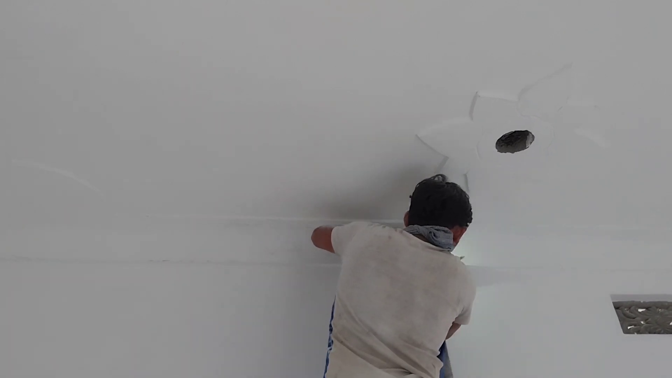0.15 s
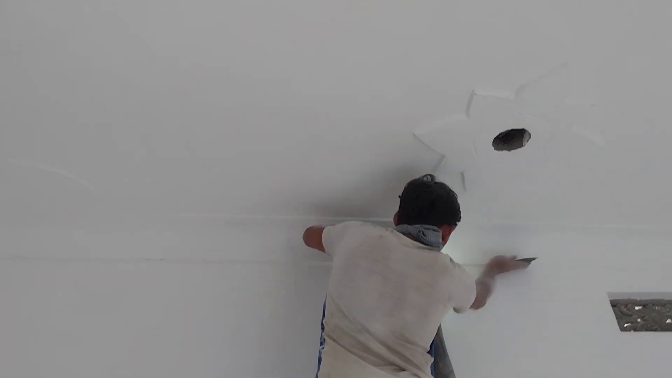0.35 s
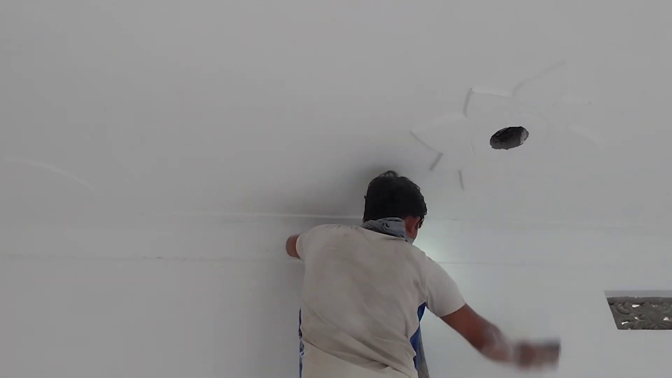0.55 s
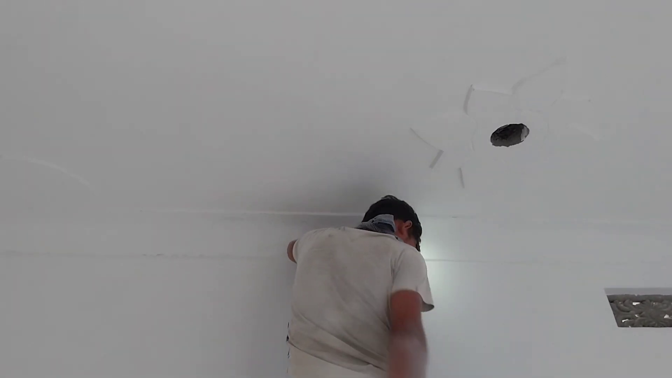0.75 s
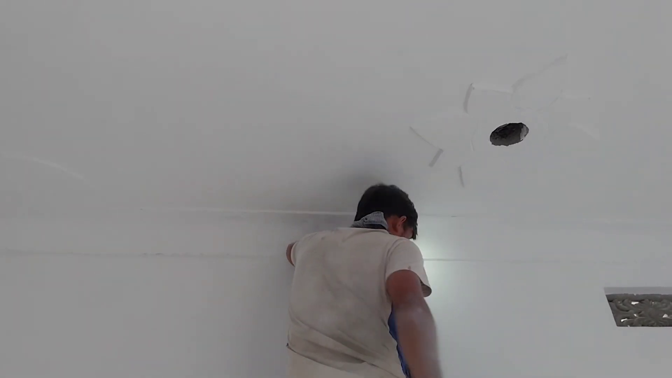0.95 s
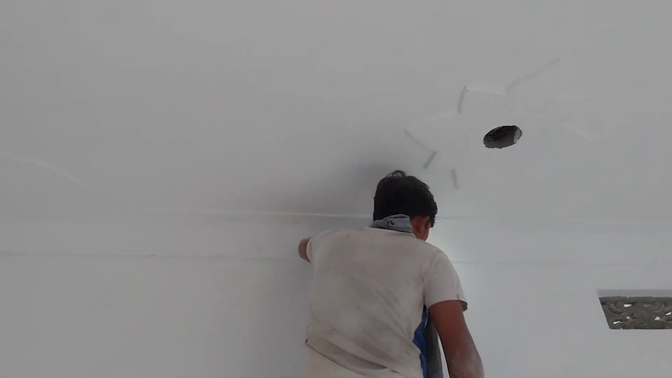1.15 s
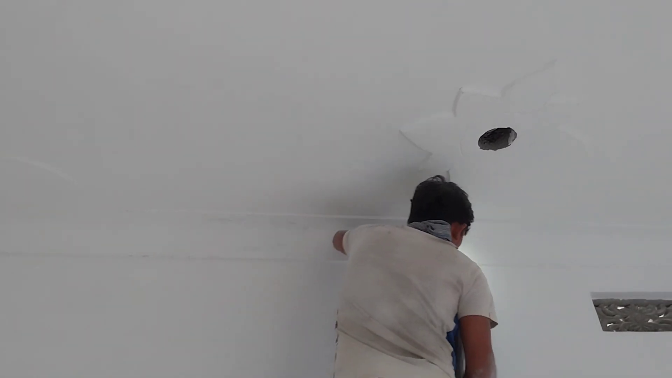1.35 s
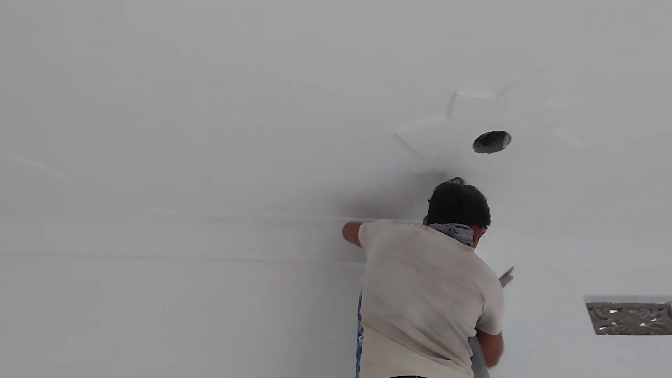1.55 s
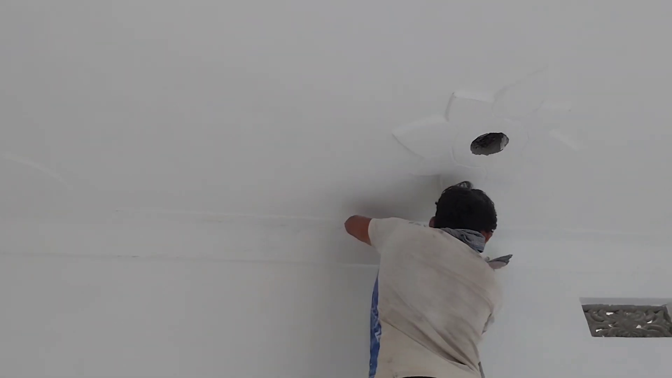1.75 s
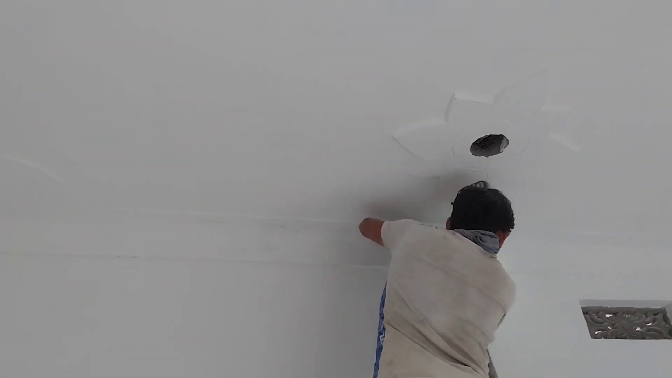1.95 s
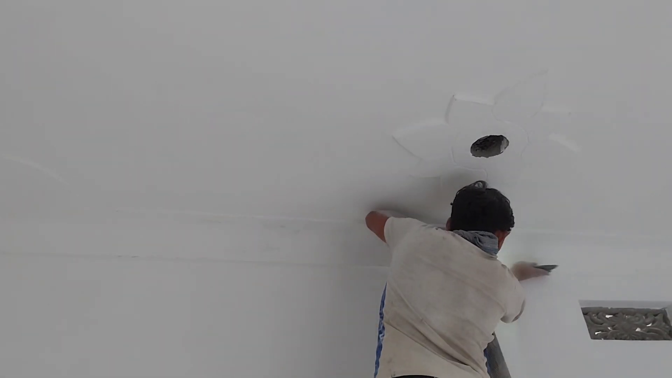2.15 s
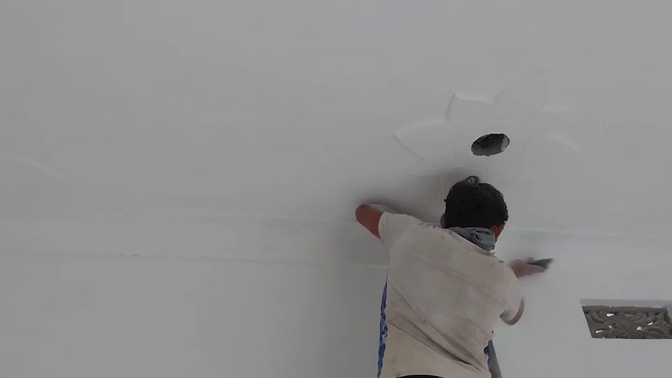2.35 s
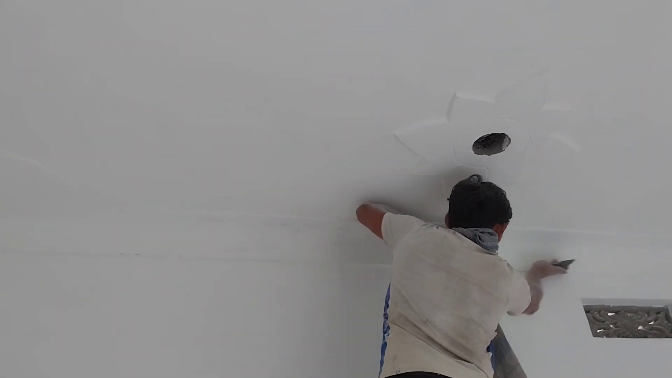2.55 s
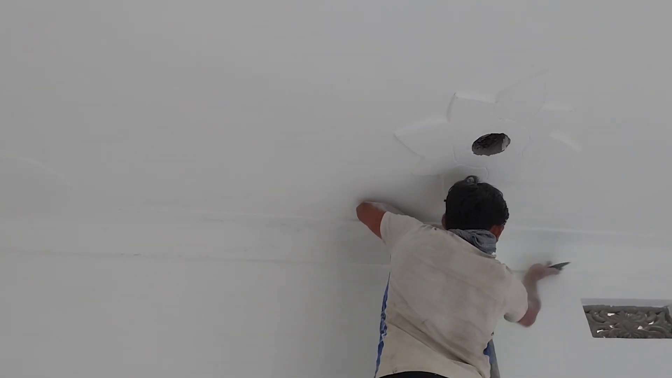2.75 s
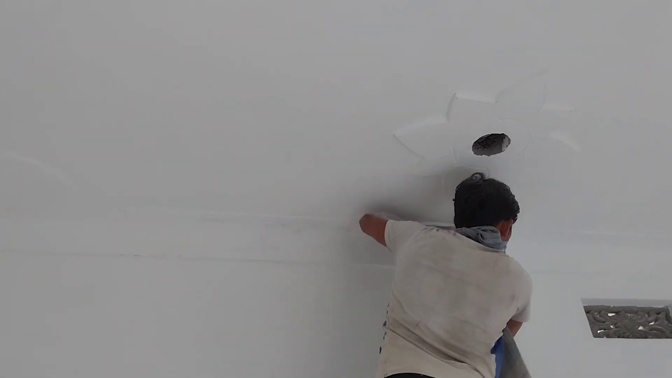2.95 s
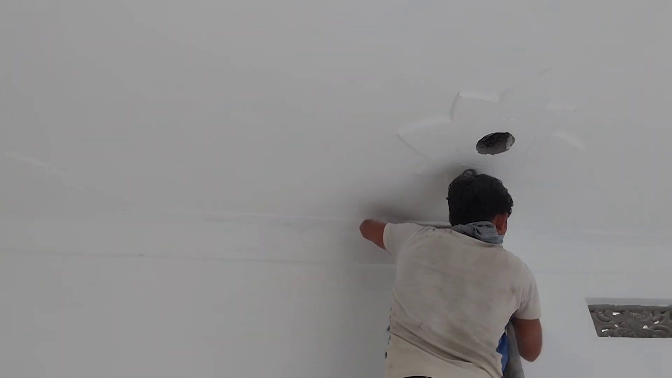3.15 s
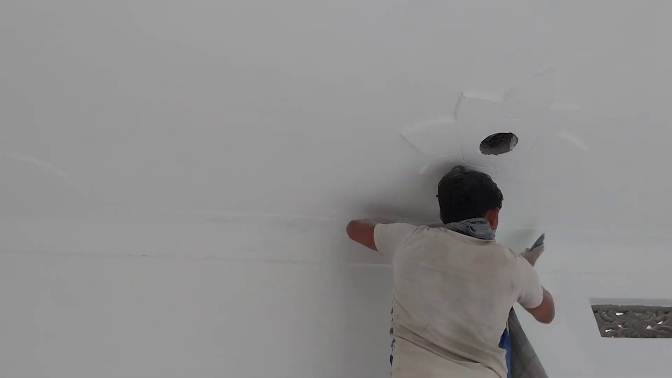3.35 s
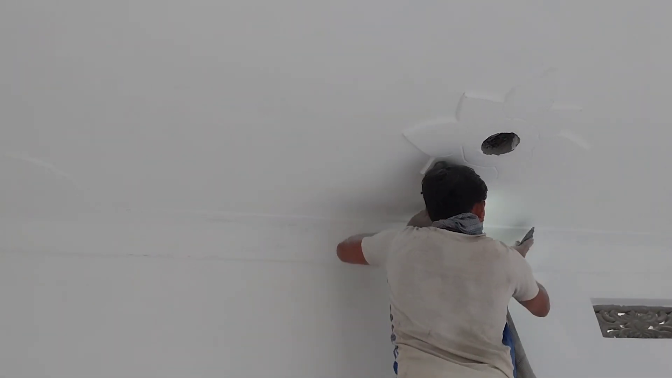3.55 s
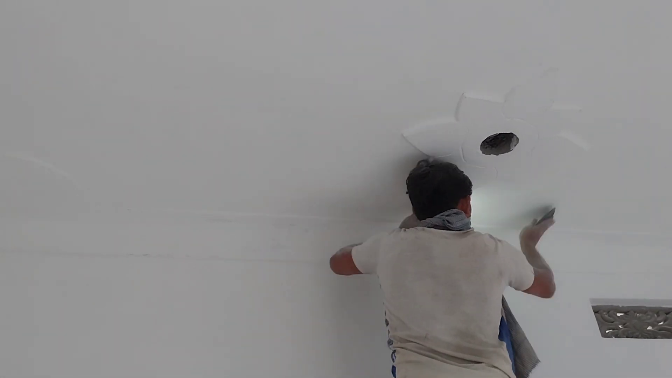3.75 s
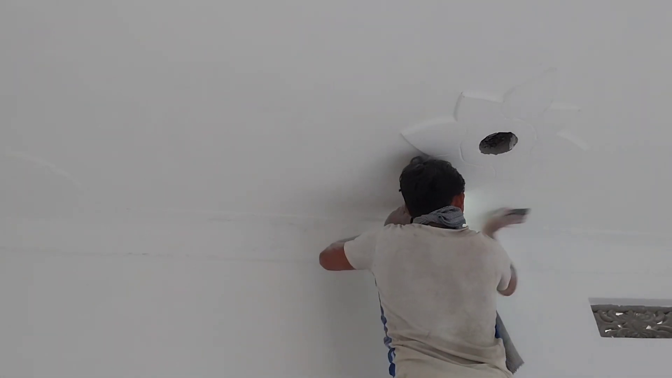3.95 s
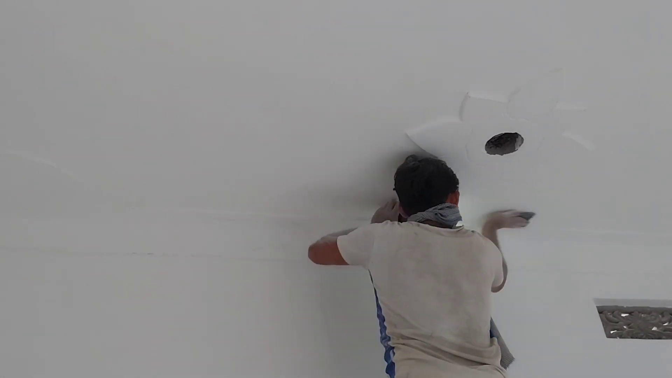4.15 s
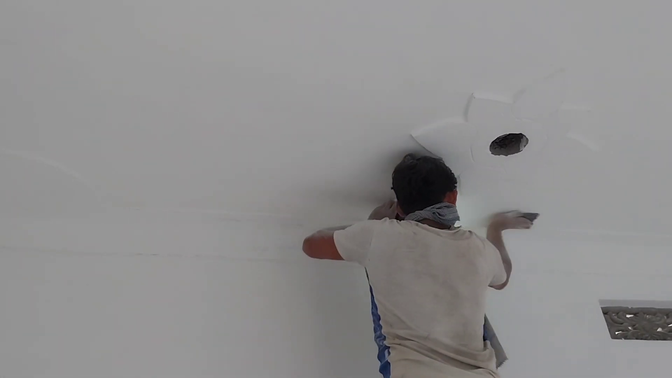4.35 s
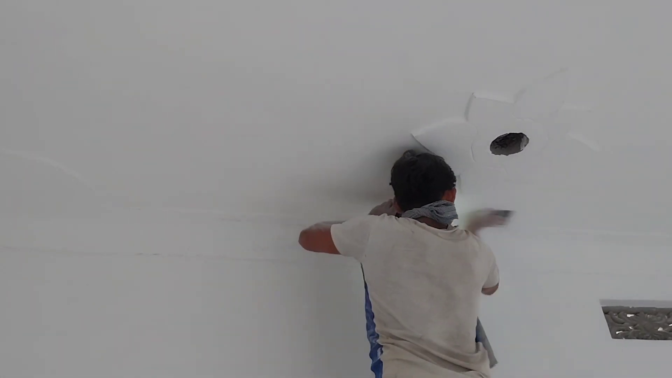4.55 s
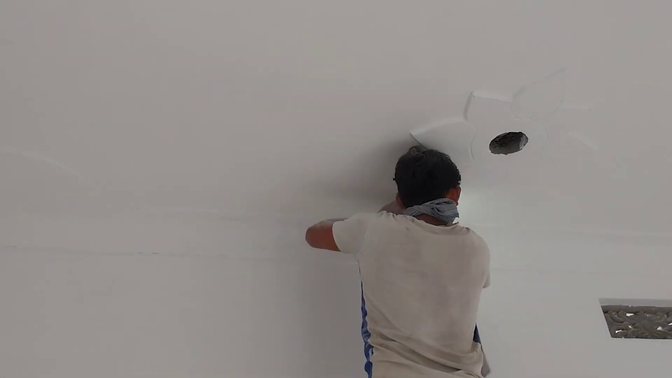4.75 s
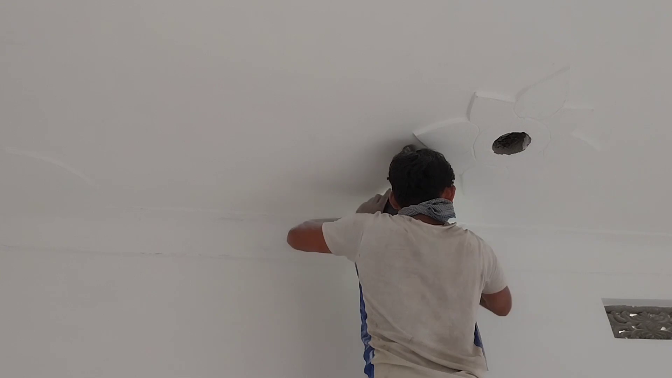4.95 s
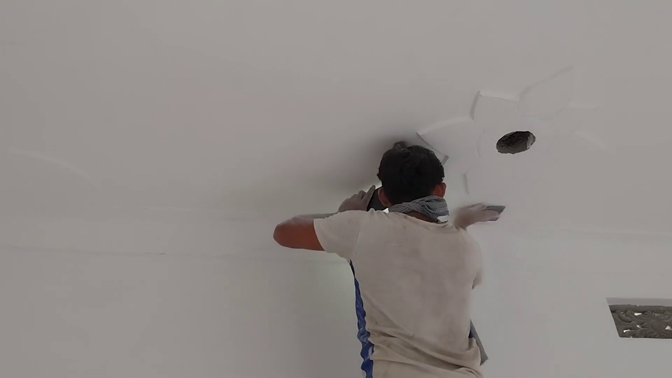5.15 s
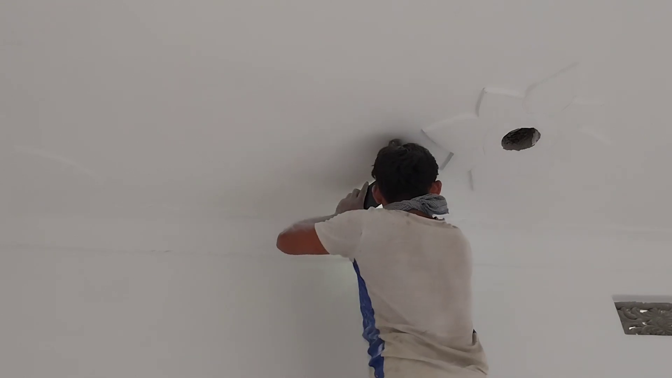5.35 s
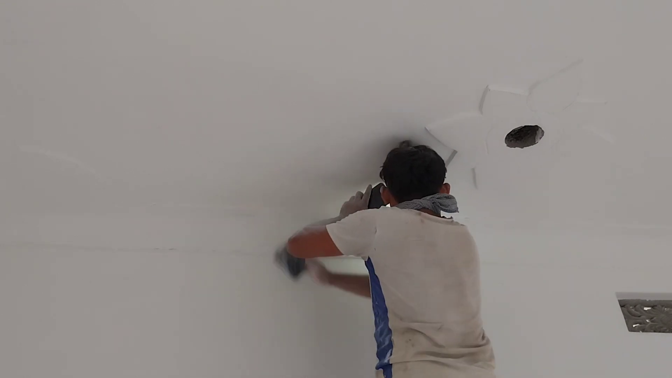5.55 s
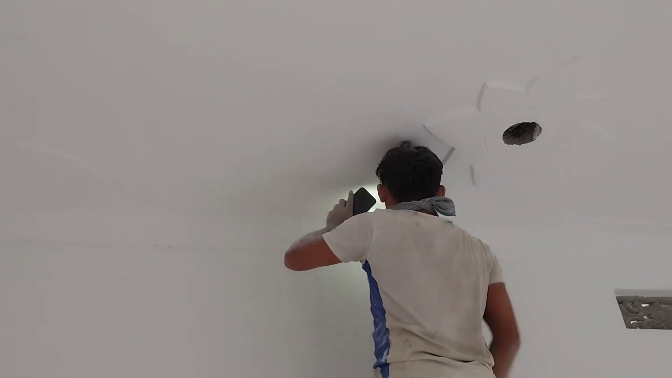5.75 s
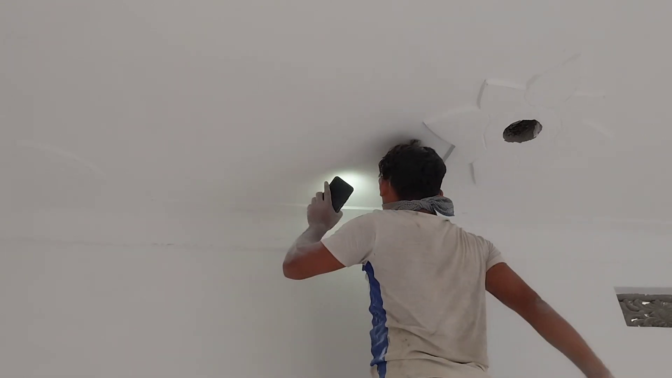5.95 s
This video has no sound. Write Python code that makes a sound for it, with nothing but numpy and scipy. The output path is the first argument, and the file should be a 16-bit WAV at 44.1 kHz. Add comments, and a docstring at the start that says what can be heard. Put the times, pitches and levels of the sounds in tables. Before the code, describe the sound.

Sandpaper scrapes dried putty in quick back-and-forth strokes, in four bouts with pauses, as a work platform rattles in an echoing bare room.

```python
"""Quick strokes of sandpaper come first: a worker sands dried putty by hand in a bare, echoing room.
There are four bouts with short pauses. Random grit hits make the hiss, the resonant paper rasps and the
board under it drums. Now and then the paper catches and chatters. The work platform lurches twice, as runs
of ringing blows, and groans once. Light knocks sound, and faint rubbing runs under it all, with still air."""
import sys
import numpy as np
from scipy import signal
from scipy.fft import rfft, irfft, next_fast_len
from scipy.io import wavfile
from scipy.ndimage import map_coordinates

SR = 44100
rng = np.random.default_rng(int(sys.argv[2]) if len(sys.argv) > 2 else 0)


def transcribe(signal):
    """Save signal, clipped to [-1, 1], as a 16-bit WAV file at the path in sys.argv[1]."""
    frames = np.atleast_2d(signal).T
    limited = np.clip(frames, -1, 1)
    pcm = np.round(limited * 32767).astype(np.int16)
    wavfile.write(sys.argv[1], SR, pcm)


N = 264159  # length in samples, about 6 s


def amp(db):
    """Turn decibels into a gain."""
    return 10 ** (np.asarray(db) / 20)


def unit(x):
    """Scale a sound to an average (rms) level of 1."""
    return x / np.sqrt(np.mean(x ** 2) + 1e-20)


def along(points, hz):
    """Read a curve of (pitch, value) points, with pitch on a log scale."""
    point_hz, values = np.transpose(points)
    return np.interp(np.log(hz + 1), np.log(point_hz + 1), values)


def curves(rows):
    """Draw a line through each column after the time: one value per sample."""
    times_s, *columns = np.transpose(rows)
    return [np.interp(np.arange(N) / SR, times_s, column) for column in columns]


def wobble(rate):
    """Make a smooth random curve through `rate` random points a second."""
    knots = rng.standard_normal(int(N * rate / SR) + 4)
    return map_coordinates(knots, [np.arange(N) * rate / SR])


def filtered(x, response):
    """Multiply the frequencies of a sound by a response."""
    n = x.shape[-1]
    padded = next_fast_len(n + 8192)
    hz = np.fft.rfftfreq(padded, 1 / SR)
    return irfft(rfft(x, padded) * response(hz), padded)[..., :n]


def coloured(x, spectrum):
    """Shape a sound by a spectrum and scale it to rms 1."""
    return unit(filtered(x, lambda hz: amp(along(spectrum, hz))))


def resonance(hz, centre, width):
    """Give the response of one resonance, strongest at its centre."""
    return 1j * hz * width / (centre ** 2 - hz ** 2 + 1j * hz * width)


def grit(rate, spread_db):
    """Tiny fractures at random moments, `rate` a second on average, a few much larger than the rest."""
    hits = rng.random(N) < rate / SR
    size_db = spread_db * np.minimum(rng.standard_normal(N), 3)
    return unit(hits * rng.standard_normal(N) * amp(size_db))


# How alike the echo is at left and right: (pitch_hz, likeness from 0 to 1)
ECHO_LIKENESS = [(60, 0.29), (150, 0.85), (300, 0.9), (500, 0.51), (900, 0.13), (2000, 0)]


def diffuse(pair):
    """Mix two unrelated signals into a left and right that are alike mainly in the bass."""
    def mid_and_side(hz):
        turn = np.arccos(np.clip(along(ECHO_LIKENESS, hz), -1, 1)) / 2
        return np.array([np.cos(turn), np.sin(turn)])

    mid, side = filtered(pair, mid_and_side)
    return np.array([mid + side, mid - side])


# Spectrum of the still air: (pitch_hz, relative level_db)
AIR_SPECTRUM = [(20, -41), (45, -10), (100, 1), (200, -2), (400, -9), (1000, -27), (4000, -3), (15800, -37)]


def still_air():
    """Steady, wide noise, strongest in the bass."""
    return amp(-68) * coloured(diffuse(rng.standard_normal((2, N))), AIR_SPECTRUM)


# How long the echo takes to fade by 60 dB: (pitch_hz, fade_s)
ECHO_FADE = [(60, 0.75), (130, 1.14), (230, 1.38), (450, 0.76), (1000, 0.68), (2200, 0.59), (5000, 0.47),
             (9000, 0.34), (15000, 0.19)]


def room(x, direct_db, walls_db, echo_db, size):
    """Many reflections scramble the phase but keep the energy, which lingers briefly between the near
    walls and longer in the room, where the treble dies first."""
    hz, t, z = signal.stft(x, SR, nperseg=size)

    def fade(t60):
        return amp(-60 * t[t < 1.2] / t60) ** 2

    def share(db, energy):
        return amp(db) ** 2 * energy / energy.sum(-1, keepdims=True)

    near_walls = share(walls_db, fade(t60=0.023))
    long_echo = share(echo_db, fade(along(ECHO_FADE, hz)[:, None]))
    # spread the energy of every frequency band over the time that follows
    energy = np.abs(signal.fftconvolve(np.abs(z) ** 2, near_walls + long_echo, axes=1))[:, :len(t)]
    # noise carries that energy, so its phase is random
    scatter = signal.stft(diffuse(rng.standard_normal((2, N))), nperseg=size)[2]
    echo = signal.istft(np.sqrt(energy) * scatter / scatter.std(), nperseg=size)[1]
    return amp(direct_db) * x + echo[:, :N]


def paper(x, pitch_hz, core_hz=520, skirt_hz=2400):
    """The sheet under the cupped hand: a resonance with a narrow core and steep skirts."""
    def sheet(hz):
        return resonance(hz, pitch_hz, core_hz) * resonance(hz, pitch_hz, skirt_hz)

    return unit(filtered(x, sheet))


# Spectrum of grit cutting the putty, also used by the strokes: (pitch_hz, relative level_db)
HISS_SPECTRUM = [(500, -34.5), (1100, -21.5), (1700, -9), (2600, -3.5), (3700, 1.5), (6000, 3.5), (7400, 2),
                 (12500, -3), (15800, -13)]
# Spectrum of the board under the putty, also used by the strokes: (pitch_hz, relative level_db)
BOARD_SPECTRUM = [(100, -17.5), (250, -15.5), (450, -26), (650, 2), (900, 4), (1300, 5), (2000, -22),
                  (4000, -22.5)]
# Faint rubbing, before the room: (time_s, hiss_db, rasp_db)
RUBBING_LEVELS = [(.75, -57, -56), (1.2, -59, -67.5), (1.7, -56.5, -63.5), (3.3, -61, -74.5), (6, -65, -84)]
RUBBING_SWING_DB, RUBBING_SWINGS_PER_S = 0.2, 9.8  # size and rate of the slower wavering


def rubbing():
    """Light rubbing, far below the strokes: hiss and rasp whose level wavers a little at random."""
    hiss_db, rasp_db = curves(RUBBING_LEVELS)
    hiss = amp(hiss_db) * coloured(grit(rate=6000, spread_db=4), HISS_SPECTRUM)
    coarse = grit(rate=1800, spread_db=3)
    board = amp(-8) * coloured(coarse, BOARD_SPECTRUM)
    rasp = amp(rasp_db) * (paper(coarse, pitch_hz=2000) + board)
    waver_db = RUBBING_SWING_DB * wobble(RUBBING_SWINGS_PER_S) + 0.37 * wobble(30)
    return (hiss + rasp) * amp(waver_db)


def skids(events, overtone, overtone_db, width_hz, attack):
    """Each contact skids briefly: noise excites two resonances and fades away."""
    out, t = np.zeros(N + SR), np.arange(SR // 3) / SR
    for start_s, level_db, pitch_hz, t60 in events:
        def body(hz):
            upper = resonance(hz, overtone * pitch_hz, width_hz)
            return resonance(hz, pitch_hz, width_hz) - amp(overtone_db) * upper

        skid = unit(filtered(rng.standard_normal(len(t)), body))
        envelope = amp(level_db - 60 * t / t60) * (1 - np.exp(-t / attack))
        out[int(start_s * SR):][:len(t)] += envelope * skid
    return out[:N]


# Light scuffing knocks, before the room: (start_s, level_db, pitch_hz, time to fade by 60 dB fade_s)
KNOCK_EVENTS = [(1.329, -52.5, 665, 0.37), (1.731, -47.5, 530, 0.8), (5.088, -57, 740, 0.44),
                (5.311, -44.5, 570, .3), (5.533, -40, 644, 0.16)]


def knocks():
    """Soft-edged skids at a low pitch with a weak overtone."""
    return skids(KNOCK_EVENTS, overtone=1.97, overtone_db=-9.5, width_hz=175, attack=0.017)


# Resonances of the groaning platform: (pitch_hz, width_hz, relative level_db)
GROAN_RESONANCES = [(309, 22, 4.5), (647, 120, -1), (1110, 330, -4.5)]
# The dragging groan swells to its peak and dies away; its level is before the room
GROAN_PEAK_S, GROAN_DB, GROAN_RISE_DB_PER_S, GROAN_FALL_DB_PER_S = 2.352, -33, 108, 146


def groan():
    """Uneven slips drive the resonances of the platform."""
    t = np.arange(N) / SR - GROAN_PEAK_S
    level_db = GROAN_DB + np.minimum(GROAN_RISE_DB_PER_S * t, -GROAN_FALL_DB_PER_S * t)

    def body(hz):
        # neighbouring resonances have opposite signs
        return sum((-1) ** k * amp(db) * resonance(hz, centre, width)
                   for k, (centre, width, db) in enumerate(GROAN_RESONANCES))

    slips = grit(rate=700, spread_db=0.5)
    return amp(level_db) * unit(filtered(slips, body))


# The platform lurches under shifting weight, before the room: (start_s, length_s, level_db)
LURCH_EVENTS = [(0.551, 0.073, -27), (1.827, .08, -26)]
RATTLE_SCATTER_S = 0.00287  # typical unevenness in the timing of the blows
RATTLE_EDGE_DB = -1.5  # first and last blow against the middle one


def rattle(count=5):
    """Rattling planks: each lurch is a quick run of blows (start_s, level_db), strongest mid-run."""
    blows = []
    for start_s, length_s, level_db in LURCH_EVENTS:
        for u in np.linspace(0, 1, count):
            blow_s = start_s + u * length_s + RATTLE_SCATTER_S * rng.standard_normal()
            blows.append((blow_s, level_db + RATTLE_EDGE_DB * (2 * u - 1) ** 2))
    return blows


# Hollow ring of the platform: (pitch_hz, relative level_db, time to fade by 60 dB fade_s)
PLATFORM_RING = [(45, -41, 0.22), (103, -16, 0.15), (159.6, -4, 0.15), (225, -14, 0.52), (240, -0.5, 0.077),
                 (298, -1.5, 0.056), (335, -0.5, 0.068), (404, -7, 0.095), (562, -6.5, 0.048),
                 (756, -17.5, 0.064)]


def thumps(attack=0.0038):
    """Each blow rings the platform's resonances with new strengths and phases."""
    out, t = np.zeros(N + SR), np.arange(SR // 2) / SR
    for start_s, level_db in rattle():
        ring = np.zeros(len(t))
        for pitch_hz, mode_db, t60 in PLATFORM_RING:
            strength = amp(mode_db + 2 * rng.standard_normal() - 60 * t / t60)
            ring += strength * np.sin(2 * np.pi * (pitch_hz * t + rng.random()))
        ring = ring * (1 - np.exp(-t / attack))
        out[int(start_s * SR):][:len(t)] += amp(level_db) * ring / np.abs(ring).max()
    return out[:N]


# The paper catches on a ridge, before the room: (start_s, level_db, pitch_hz, time to fade by 60 dB fade_s)
CATCH_EVENTS = [(.08, -31, 2060, 0.44), (.18, -32, 2170, 0.11), (.333, -26.5, 1850, 0.33),
                (.478, -43.5, 1930, 0.62), (1.843, -31, 2250, 0.1), (2.16, -29.5, 1900, 0.31),
                (2.84, -32.5, 2360, 0.38), (2.9, -27, 2220, 0.3), (2.97, -33.5, 1810, 0.37),
                (5.09, -57.5, 2219, .4)]


def chatter():
    """The caught paper skids with a quick start, a high pitch and a strong overtone."""
    return skids(CATCH_EVENTS, overtone=1.85, overtone_db=-4, width_hz=250, attack=0.0025)


# Sandpaper strokes, the weak ones as it brushes the wall or is laid on: (start_s, length_s, relative level_db)
STROKE_EVENTS = [(-.105, 0.14, -18), (0.034, 0.2, -22.5), (0.215, 0.24, -22), (.89, 0.089, -48),
                 (1.243, 0.19, -55), (1.736, 0.1, -35.5), (1.811, 0.21, -23.5), (1.992, .33, -24),
                 (2.32, 0.19, -21.5), (2.47, 0.24, -24), (2.717, 0.35, -24.5), (3.8, 0.16, -41.5),
                 (3.913, 0.18, -18.5), (4.076, 0.12, -16), (4.175, 0.15, -17.5), (4.304, 0.14, -17.5),
                 (4.419, 0.14, -16), (4.535, 0.15, -17.5), (4.646, 0.24, -21), (5.155, 0.1, -26),
                 (5.205, 0.2, -20), (5.338, .27, -20)]
# The paper sounds different on each patch of wall; levels are set against the hiss:
# (from_s, rasp_db, board_db, rasp pitch_hz)
WALL_PATCHES = [(-.2, -10.5, -21.5, 2060), (1.7, -9, -21.5, 2270), (2.3, -13, -21.5, 2290),
                (2.7, -8, -18.5, 2240), (3.7, -17.5, -63, 2120), (5.1, -16.5, -51, 2260)]
SPEED_UP_S, SLOW_DOWN_S = 0.093, 0.09  # the hand at the two ends of every stroke
HISS_GROWS, BODY_GROWS = 1.155, 0.46  # powers of the hand's speed


def sanding():
    """The hand speeds up, glides and slows; the hiss follows its speed more steeply than rasp and board."""
    t = np.arange(N) / SR
    fine = coloured(grit(rate=14000, spread_db=6.0), HISS_SPECTRUM)
    coarse = grit(rate=3300, spread_db=2.5)
    board = coloured(grit(rate=1300, spread_db=3), BOARD_SPECTRUM)

    def ease(u):
        return np.sin(np.pi / 2 * np.clip(u, 0, 1))

    out = np.zeros(N)
    for start_s, length_s, level_db in STROKE_EVENTS:
        end_s = start_s + length_s
        # the latest patch reached when the stroke starts
        _, rasp_db, board_db, pitch_hz = [patch for patch in WALL_PATCHES if patch[0] <= start_s][-1]
        on = (t > start_s) & (t < end_s)
        speed = ease((t[on] - start_s) / SPEED_UP_S) * ease((end_s - t[on]) / SLOW_DOWN_S)
        body = amp(rasp_db) * paper(coarse[on], pitch_hz) + amp(board_db) * board[on]
        out[on] += amp(level_db) * (speed ** HISS_GROWS * fine[on] + speed ** BODY_GROWS * body)
    # the pressure flutters as the sheet rides over the uneven putty
    flutter_db = 0.68 * wobble(90) + 2.04 * wobble(260)
    return out * amp(flutter_db)


def scene():
    """The worker's body hides the paper, so the sanding arrives mostly by reflection."""
    air = still_air()
    contacts = room(knocks() + groan(), direct_db=-3.5, walls_db=-9, echo_db=-1.0, size=1024)
    boom = room(thumps(), direct_db=-1.0, walls_db=-9.5, echo_db=-2.0, size=1024)
    catches = room(chatter(), direct_db=-5.5, walls_db=0, echo_db=-0.5, size=512)
    scrape = room(sanding() + rubbing(), direct_db=-20.5, walls_db=-7.0, echo_db=-1.5, size=256)
    return air + contacts + boom + catches + scrape


# Colour shared by both microphone ports: (pitch_hz, level_db)
PORT_COLOUR = [(5000, -1), (7400, -1.5), (8000, -7), (8500, -10), (9600, -5.5), (11200, -1.5), (12600, 2),
               (14200, 3.5), (15800, 5.5)]
# How the two ports differ: (pitch_hz, left minus right level_db)
LEFT_MINUS_RIGHT = [(300, -1), (900, -3), (1400, -6.5), (2000, -6.5), (3000, -7.5), (3900, -4.5),
                    (4600, -2), (6200, -4), (8200, -7.5), (11500, -8), (13200, -5.5), (14800, -1.5)]
TOP_HZ = 15780  # nothing passes from here up


def record(dry):
    """Each microphone port has its own colour, and a sharp limit cuts off the highest treble."""
    def ports(hz):
        lean_db = np.array([[0.5], [-0.5]]) * along(LEFT_MINUS_RIGHT, hz)
        return amp(along(PORT_COLOUR, hz) + lean_db) * (hz < TOP_HZ)

    return filtered(dry, ports)


dry = scene()
out = record(dry)
transcribe(out)
```